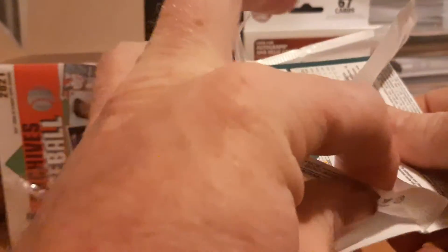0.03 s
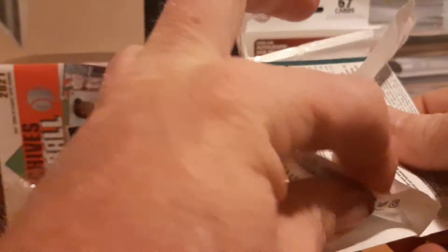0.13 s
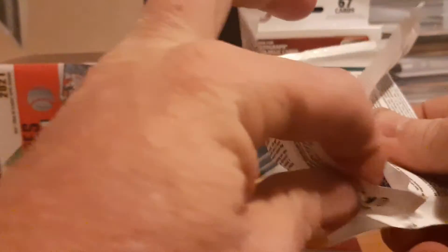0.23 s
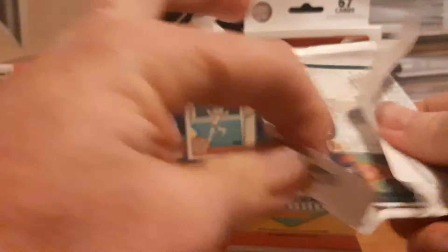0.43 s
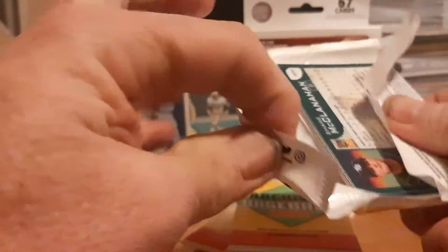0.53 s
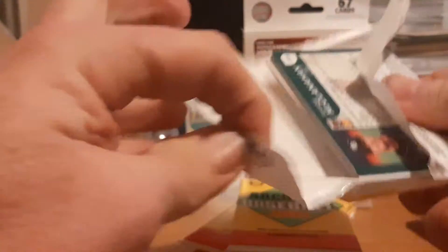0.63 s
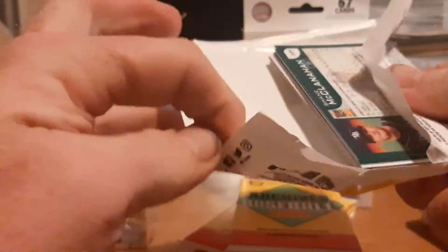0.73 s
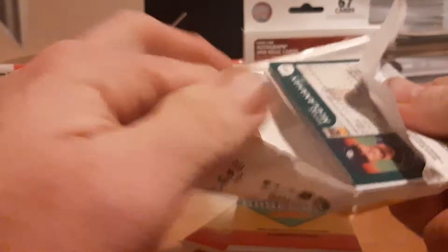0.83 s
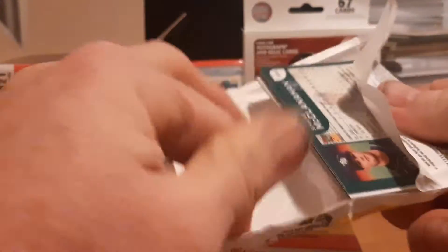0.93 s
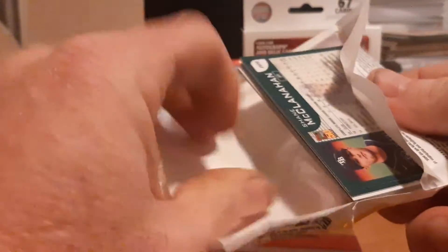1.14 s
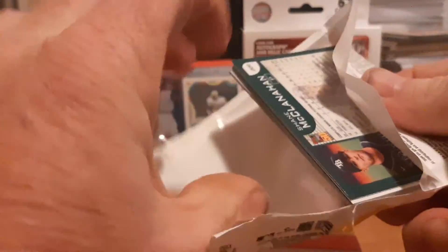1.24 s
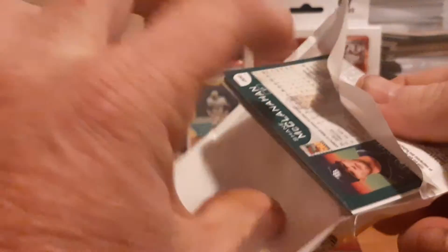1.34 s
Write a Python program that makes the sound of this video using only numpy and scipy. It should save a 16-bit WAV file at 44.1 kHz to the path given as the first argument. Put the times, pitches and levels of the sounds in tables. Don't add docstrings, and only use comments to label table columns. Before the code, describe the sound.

A plastic card-pack wrapper is torn by hand, close and dry in a small room. Faint ticks lead to sharp snaps at 0.2-0.26 s, a brief lull, then a dense, loud crackling rip at 0.41-0.6 s with hollow card knocks and dull thumps. Lighter snaps and soft finger rubbing follow from 0.67 s, nearly quiet around 0.85 s, then sparse crackles, clearer near 1.26 and 1.4 s, over faint hiss.

```python
import sys
import numpy as np
from scipy import signal
from scipy.fft import rfft, irfft
from scipy.io import wavfile

SR = 44100
rng = np.random.default_rng(int(sys.argv[2]) if len(sys.argv) > 2 else 0)


def store_pcm(level_fs):
    pcm = np.round(np.clip(level_fs, -1, 1) * 32767).astype(np.int16)
    wavfile.write(sys.argv[1], SR, np.atleast_2d(pcm).T)


def level_to_linear(level):
    exponent = np.asarray(level, float) / 20
    return 10 ** exponent


N = 61739

# (frequency [Hz], density [dB per Hz])
HUSH_SPECTRUM = [(30, -5), (150, -8.5), (400, -7), (650, -12), (2000, -20), (3600, -8), (9000, -51),
                 (14000, -29)]
HUSH_DB = -73
HUM_HZ, HUM_WIDTH_HZ, HUM_DB, HUM_FADE_S = 403, 110, -73.5, 0.16

# (frequency [Hz], decay by 60 dB [s])
ROOM_DECAY = [(200, 0.43), (1000, 0.26), (8000, 0.13)]
ROOM_DB, TABLE_DB, TABLE_S = -13, -3.5, .002
# (frequency [Hz], gain [dB])
TABLE_COLOUR = [(450, 0), (850, -2), (1600, 0.5), (2450, -2.5), (3150, 1), (4200, 0)]
# (frequency [Hz], gain [dB])
PORT_COLOUR = [(40, -5), (130, 1), (7400, 0), (8100, -9.5), (8600, -18.5), (9300, -12.5), (11500, -6)]
EDGE_HZ, RIGHT_DB = 16000, 1
APART, APART_HZ = 1.61, 1820
DRIFT_S_PER_S = 1e-4

# (time [s], level [dB], pitch [Hz])
PACK_THUMPS = [
    (0.248, -50.5, 345),
    (0.438, -46.5, 236),
    (0.481, -38.5, 288),
    (0.511, -40, 257),
    (0.556, -46, 273),
    (.59, -50, 345),
    (.705, -59.5, 368),
    (.81, -67, 188),
    (1.05, -65.5, 168),
    (1.396, -47, 275),
]
THUMP_S = .005

# (start [s], length [s], level [dB])
FINGER_SLIDES = [
    (0.691, 0.35, -47.5),
    (0.941, 0.21, -52),
    (1.172, 0.16, -50.5),
]
# (frequency [Hz], gain [dB])
SLIDE_SPECTRUM = [(500, -6.5), (2500, -3), (5600, 4), (14000, 5.5)]

# (time [s], peak level [dB], pitch [Hz])
CARD_KNOCKS = [(0.2095,-20.5,2140), (0.2515,-25.5,1770), (.2515,-38,720), (0.355,-33.5,960),
               (0.4113,-32,1570), (0.4315,-22.5,1560), (0.4445,-23,1560), (0.461,-20,1510),
               (0.4735,-23,1530), (0.4913,-19,940), (.4915,-18,1414), (0.5105,-23.5,935), (0.5232,-14,794),
               (0.5315,-20,1500), (.5317,-21.5,616), (0.549,-25,1470), (0.5925,-31,1110), (0.634,-41,680),
               (.669,-40.5,830), (0.6905,-48,710), (0.7686,-43.5,990), (0.9225,-46,1570), (1.1033,-43,720),
               (1.2548,-36,1660), (1.2634,-32,950)]
# (time [s], peak level [dB], pitch [Hz])
LOOSE_CARDS = [
    (1.1, -41, 730),
    (1.1, -44.5, 632),
    (.47, -26, 1300),
]
# (time [s], peak level [dB], pitch [Hz])
TWIN_CREASES = [(0.2085,-23,3700), (0.214,-16.5,2890), (0.2328,-15,3380), (0.3552,-23,2845),
                (0.4112,-23,2980), (0.4323,-24,3700), (0.453,-22,3000), (.485,-20.5,3100),
                (0.5062,-37,3490), (0.5262,-21.5,3950), (0.5925,-23.5,2660), (0.7686,-25.5,2630),
                (0.7983,-45,3000), (.8015,-36,2170), (0.9225,-34,2790), (0.9375,-38,2800),
                (1.2475,-37,2340), (1.2551,-35.5,2780), (1.2636,-28.5,2930)]
# (time [s], peak level [dB], pitch [Hz])
SMALL_CREASES = [(0.214,-16.5,5700), (0.2328,-12.5,5660), (0.431,-16.5,5640), (0.4574,-25,5150),
                 (0.491,-16.5,5700), (0.506,-24.5,5530), (.5265,-13.5,5530), (0.552,-34,5400),
                 (0.95,-44,7000), (1.255,-25.5,7600), (1.26,-38,4630), (1.263,-28,6230)]
KNOCK_DB, KNOCK_WIDTH_HZ = -2.5, 175
TWIN_DB, TWIN_WIDTH_HZ = -2, 314
LOOSE_DB, LOOSE_WIDTH_HZ = 0, 60
KNOCK_CUT_HZ = 520

# (time [s], crackle level [dB])
HAND_PULL = [(0, -64.5), (0.126, -65.5), (0.193, -46.5), (0.216, -36.5), (0.323, -41.5), (.345, -53),
             (0.378, -52), (0.417, -34), (0.484, -25), (0.528, -35.5), (0.598, -47), (0.657, -54),
             (0.698, -48), (0.862, -70), (.915, -74), (.95, -62), (1.035, -60), (1.08, -55), (1.27, -52),
             (1.34, -63)]
# (frequency [Hz], gain [dB])
CRACKLE_SPECTRUM = [(60, -21), (280, -1), (480, -7.5), (750, 4), (1500, 1), (3300, 3), (5700, -1),
                    (12000, -2.5)]
CRACKLES_PER_S, SPREAD_DB, SLACK_SPREAD_DB = 4000, 4.5, 1.5
SLACK_TILT_DB = 11.5

# (time [s], peak [dB], crease pitch [Hz], card thud [dB], fizz [dB])
PULL_SNAPS = [(0.0692, -45.5, 3900, -29, -33), (0.086, -51.5, 3780, -18, -24), (0.105, -34, 3240, -43, -43),
              (0.1325, -35, 5400, -39, -12), (0.1455, -36, 5600, -7.5, -11), (0.1795, -35, 5000, -14, -3),
              (0.1945, -32.5, 2010, -14.5, -20), (0.2082, -7.5, 5430, -23, -11),
              (0.214, -8, 3700, -25, -15), (0.2207, -29, 3520, -25, 9), (0.2268, -12.5, 3270, -12.5, -22),
              (0.2325, -6, 3700, -29, -10), (0.2519, -10.5, 5720, -6.5, -11.5),
              (0.2593, -15.5, 3680, -27, -8), (0.2857, -26, 5460, -24, -0.5), (0.322, -27, 3900, -22, 1),
              (0.3558, -26.5, 2820, 3.5, -48), (0.3847, -29, 5680, -24, -3), (0.3934, -24, 5550, -1, -2),
              (0.3963, -17.5, 5230, -39, -6)]
# (time [s], peak [dB], crease pitch [Hz], card thud [dB], fizz [dB])
TEAR_SNAPS = [(0.4107, -15.5, 3660, -2, -4), (0.4174, -17.5, 3960, -11.5, -5),
              (0.426, -20, 5970, -26, -10.5), (0.432, -11, 3130, -6.5, -10), (0.4368, -21, 3900, -13, 4.5),
              (0.4442, -12.5, 5650, -16, -9.5), (0.4526, -17.5, 5470, -26, -5),
              (0.46, -19, 3240, -2.5, -24.5), (0.4683, -11, 4370, 3.5, -17), (0.473, -11, 3640, -8, -14),
              (0.477, -19, 3240, 5, -8), (0.4831, -11.5, 3220, -0.5, -6.5), (0.4883, -19, 3000, -35, -19),
              (0.4913, -4, 4420, -10, -12.5), (0.5015, -24.5, 5700, 6, -19), (0.5074, -20, 3350, -20, -22),
              (0.5127, -14.5, 4390, 1, -5.5), (0.5229, -15.5, 5100, 2, -12), (0.526, -7, 4700, -18, -10.5),
              (0.5314, -23.5, 3920, 3.5, -30), (0.5493, -16, 2950, -6.5, -38.5),
              (0.5684, -23, 1700, -7, -29), (0.5928, -26, 2480, 5.5, -37)]
# (time [s], peak [dB], crease pitch [Hz], card thud [dB], fizz [dB])
SETTLING_SNAPS = [(0.6691, -20.5, 5220, -15, -8), (0.6736, -23, 7100, -1, -7),
                  (0.6909, -29.5, 2830, -1, -17), (0.7686, -21.5, 4600, -15.5, -13),
                  (0.7935, -45.5, 5700, 4, 15), (0.7993, -29.5, 2680, -35, -6.5),
                  (0.8863, -41.5, 2970, -22, -3.5), (0.9229, -32, 2900, -18, -18),
                  (0.9379, -29, 4370, -12, -10.5), (0.9992, -34, 1940, -1, -14),
                  (1.0482, -32, 3420, -9, -9), (1.0556, -33.5, 3800, 0, -15),
                  (1.067, -23, 2800, -10.5, -16), (1.0778, -29, 4640, -24, -7.5),
                  (1.0913, -40, 4000, 10.5, -16), (1.1036, -30, 3930, 3.5, -7), (1.1481, -26, 3700, 0, -19),
                  (1.2003, -45, 1880, 15, -6), (1.2478, -33, 6000, -18, -15), (1.255, -20, 4900, -9.5, -17),
                  (1.2635, -17, 5420, -7, -9), (1.3463, -32, 4050, -20, -17), (1.3544, -30, 3080, -15, -25),
                  (1.3977, -19.5, 6270, -28, -19)]
# (frequency [Hz], width [Hz], level [dB])
FILM_MODES = [(2480, 960, 16), (3700, 3700, 19), (5490, 360, 19), (7550, 1100, -1)]
# (frequency [Hz], width [Hz], level [dB])
CARD_MODES = [(660, 180, 0), (1000, 300, -4), (1550, 300, 3)]
SNAP_S, SHIVER, CLEAN_DB = .001, .5, 14
CREASE_WIDTH_HZ, FILM_DB = 800, -3
FIZZ_HZ, FIZZ_S = 8400, .0012
SNAP_LIFT_DB, CARD_LIFT_DB, FIZZ_LIFT_DB = -1.5, -5, 8


def evened(x):
    return x / np.sqrt(np.mean(x ** 2) + 1e-20)


def peaked(x):
    return x / np.max(abs(signal.hilbert(x.mean(0))))


def read(points, hz):
    f, value = np.transpose(points)
    return np.interp(np.log(hz + 1), np.log(f + 1), value)


def coloured(x, gain_db):
    return irfft(rfft(x) * level_to_linear(gain_db), x.shape[-1])


def high_passed(x, order, cut_hz):
    return signal.sosfilt(signal.butter(N=order, Wn=cut_hz, btype="high", fs=SR, output="sos"), x)


def ring(x, hz, width):
    b, a = signal.iirpeak(np.clip(hz, 20, SR / 2.2), np.clip(hz / width, .3, 99), fs=SR)
    return signal.lfilter(b, a, x)


def rings(x, modes):
    return sum(level_to_linear(db) * ring(x, hz, width) for hz, width, db in modes)


def paired(size):
    own = high_passed(rng.standard_normal((2, size)), 2, APART_HZ)
    return rng.standard_normal(size) + APART * own


def hush():
    noise = rng.standard_normal(N) * 1.4 + rng.standard_normal((2, N))
    hz = np.fft.rfftfreq(N, 1 / SR)
    return level_to_linear(HUSH_DB) * evened(coloured(noise, read(HUSH_SPECTRUM, hz)))


def hum():
    once = ring(rng.standard_normal(N), HUM_HZ, HUM_WIDTH_HZ)
    tone = ring(once, HUM_HZ, HUM_WIDTH_HZ)
    return level_to_linear(HUM_DB) * evened(tone) * np.exp(-np.arange(N) / SR / HUM_FADE_S)


def space(x):
    size = SR // 2
    taps = np.zeros((2, size))
    at = np.arange(200, size - 20, 20) + rng.integers(0, 20, (2, (size - 201) // 20))
    np.put_along_axis(taps, at, rng.choice([-1., 1.], at.shape), 1)
    hz, t, bands = signal.stft(taps, SR, nperseg=256)
    fade = level_to_linear(-60 * t / read(ROOM_DECAY, hz)[:, None])
    tail = signal.istft(bands * fade, SR, nperseg=256)[1][:, :size]

    near = np.zeros((2, size))
    close = rng.integers(25, 400, (2, 9))
    echoes = rng.choice([-1., 1.], close.shape) * np.exp(-close / SR / TABLE_S)
    np.put_along_axis(near, close, echoes, 1)

    room = level_to_linear(ROOM_DB) * tail / np.linalg.norm(tail[0])
    table = level_to_linear(TABLE_DB) * near / np.linalg.norm(near[0])
    return signal.fftconvolve(x, room + table, axes=1)[:, :N]


def thumps():
    t, out = np.arange(2048) / SR, np.zeros(N + 2048)
    push = t / THUMP_S * np.exp(1 - t / THUMP_S)
    for s, db, hz in PACK_THUMPS:
        tone = np.sin(2 * np.pi * hz * t) + 0.23 * np.sin(2 * np.pi * .5 * hz * t)
        out[round(s * SR):][:2048] += level_to_linear(db) * push * tone
    return out[:N]


def slides():
    t, shape = np.arange(N) / SR, np.zeros(N)
    for s, length, db in FINGER_SLIDES:
        u = np.clip((t - s) / length, 0, 1)
        shape += level_to_linear(db) * np.minimum(u / 0.034, 1) * (1 - u) ** 2.14
    hz = np.fft.rfftfreq(N, 1 / SR)
    return shape * evened(coloured(paired(N), read(SLIDE_SPECTRUM, hz)))


def tones(rows, lift_db, width_hz):
    out, t = np.zeros(N + 1024), np.arange(1024) / SR
    shape = (1 - np.exp(-t / 0.0002)) * np.exp(-np.pi * width_hz * t)
    shape = shape / shape.max()
    for s, db, hz in rows:
        at = round(s * SR)
        out[at:at + 1024] += level_to_linear(db + lift_db) * shape * np.sin(2 * np.pi * hz * t)
    return high_passed(out[:N], 4, KNOCK_CUT_HZ)


def crackle():
    level_db = np.interp(np.arange(N) / SR, *np.transpose(HAND_PULL))
    slack = np.clip((-32 - level_db) / 16, 0, 1)
    spread_db = SPREAD_DB + (SLACK_SPREAD_DB - SPREAD_DB) * slack
    size = level_to_linear(spread_db * np.minimum(rng.exponential(1, N), 4))
    size *= rng.random(N) < CRACKLES_PER_S / SR
    size *= rng.choice([-1., 1.], N)

    kind = rng.integers(0, 24, N)
    out, t = np.zeros((2, N)), np.arange(256) / SR
    for k in range(24):
        grain = paired(256) * np.exp(-t / 0.00033)
        out += signal.oaconvolve((size * (kind == k))[None], grain, axes=1)[:, :N]
    hz = np.fft.rfftfreq(N, 1 / SR)
    out = evened(coloured(out, read(CRACKLE_SPECTRUM, hz)))
    low = signal.sosfilt(signal.butter(N=2, Wn=1200, fs=SR, output="sos"), out)
    lost_bass = low * (1 - level_to_linear(-SLACK_TILT_DB * slack))
    return (out - lost_bass) * level_to_linear(level_db)


def snap(db, hz, card_db, fizz_db):
    t = np.arange(1024) / SR
    kick = SHIVER * paired(1024) * np.exp(-t / SNAP_S)
    first = rng.integers(0, 4, 2)
    kick[[0, 1], first] += 2
    flip = kick.copy()
    flip[[0, 1], first // 2] += level_to_linear(CLEAN_DB)

    crease = peaked(ring(flip, hz, CREASE_WIDTH_HZ))
    film = peaked(ring(rings(kick, FILM_MODES), hz, 2.56 * hz))
    bright = high_passed(crease + level_to_linear(FILM_DB) * film, 2, 1200)
    cards = high_passed(rings(kick, CARD_MODES), 3, 600)
    spit = paired(1024) * t * np.exp(-2 * t / FIZZ_S)
    fizz = high_passed(spit, 4, FIZZ_HZ)

    sound = peaked(bright)
    sound = sound + level_to_linear(card_db + CARD_LIFT_DB) * peaked(cards)
    sound = sound + level_to_linear(fizz_db + FIZZ_LIFT_DB) * peaked(fizz)
    return level_to_linear(db + SNAP_LIFT_DB) * sound


def snaps():
    out = np.zeros((2, N + 2048))
    for s, *row in PULL_SNAPS + TEAR_SNAPS + SETTLING_SNAPS:
        sound = snap(*row)
        at = round(s * SR)
        late = at + max(round(DRIFT_S_PER_S * (s - .5) * SR), 0)
        out[0, at:at + 1024] += sound[0]
        out[1, late:late + 1024] += sound[1]
    return out[:, :N]


def scene():
    film = snaps() + crackle() + slides() + thumps()
    film += tones(CARD_KNOCKS, KNOCK_DB, KNOCK_WIDTH_HZ)
    film += tones(TWIN_CREASES + SMALL_CREASES, TWIN_DB, TWIN_WIDTH_HZ)
    film += tones(LOOSE_CARDS, LOOSE_DB, LOOSE_WIDTH_HZ)
    hz = np.fft.rfftfreq(N, 1 / SR)
    heard = coloured(film + space(film), read(PORT_COLOUR, hz) + read(TABLE_COLOUR, hz))
    return heard * level_to_linear(np.array([[0], [RIGHT_DB]])) + hush() + hum()


def roll_off(x):
    return signal.sosfilt(signal.butter(12, 16970, fs=SR, output="sos"), x)


def record(dry):
    taps = signal.firwin(255, EDGE_HZ, window=("kaiser", 5), fs=SR)
    mix = signal.oaconvolve(np.tanh(dry), taps[None], "same")
    return roll_off(mix)


dry = scene()
out = record(dry)
store_pcm(out)
```